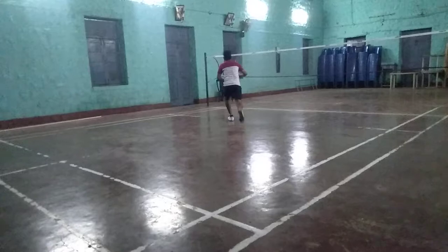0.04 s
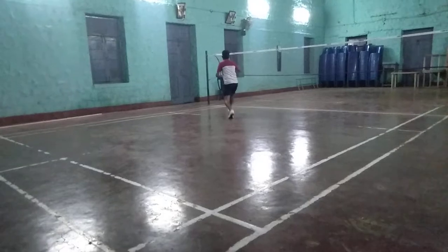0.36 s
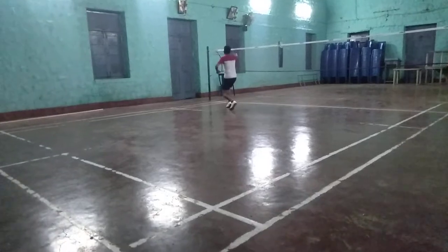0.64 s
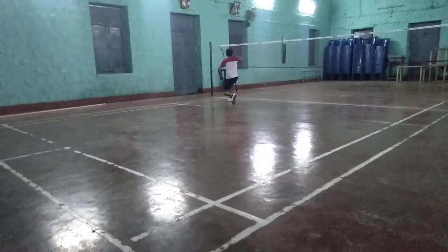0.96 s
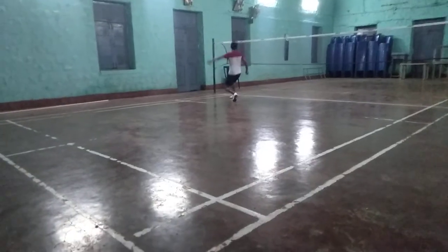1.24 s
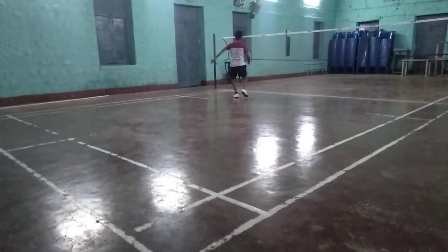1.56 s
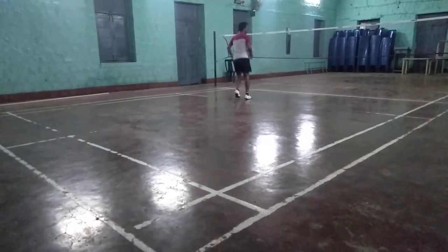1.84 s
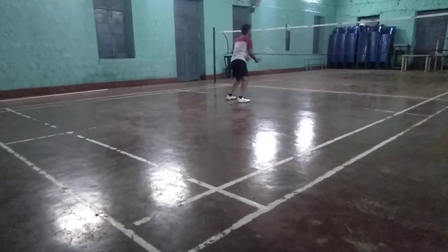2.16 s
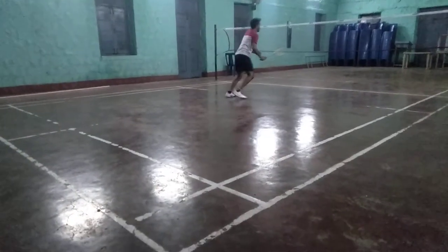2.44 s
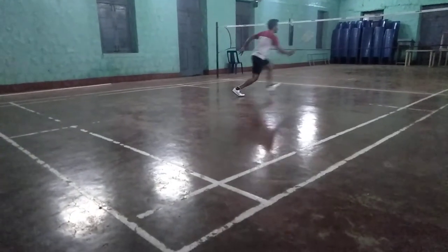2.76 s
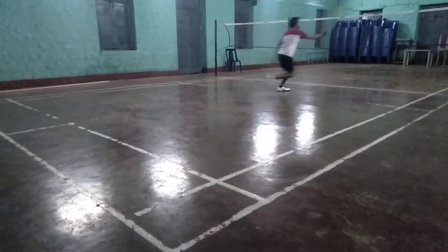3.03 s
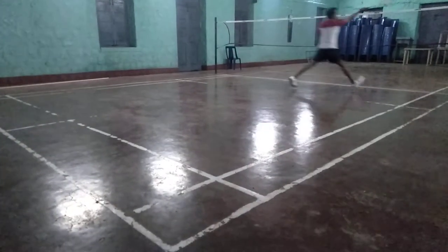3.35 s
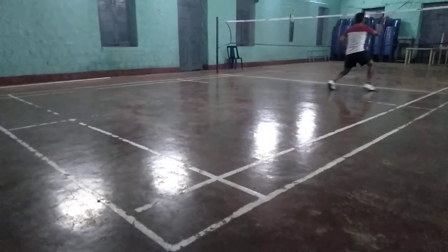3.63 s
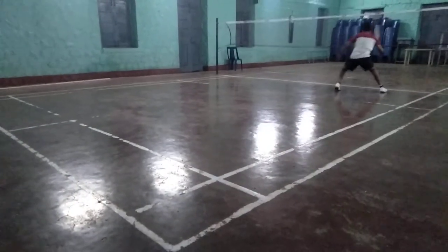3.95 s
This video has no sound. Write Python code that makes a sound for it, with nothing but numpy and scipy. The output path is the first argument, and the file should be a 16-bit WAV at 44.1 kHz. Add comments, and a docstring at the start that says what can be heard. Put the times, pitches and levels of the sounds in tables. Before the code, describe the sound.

Rubber-soled shoes squeak, thud and scuff on a glossy court as a badminton player practises footwork. The steps come in three short flurries, each ringing out in a large hall, heard by one microphone over a low rumble.

```python
"""A large, hard-walled sports hall; one microphone hears a badminton player practise footwork.
Rubber soles stick and slip on the glossy floor in short squeaks, land with thuds, slaps and clicks,
and scuff between steps; a few faint, lower squeals sound among them.
The direct sound arrives first, then the walls draw it out into a long tail over a low rumble."""
import sys
import numpy as np
from scipy import signal
from scipy.fft import rfft, irfft
from scipy.io import wavfile

SR = 44100
rng = np.random.default_rng(int(sys.argv[2]) if len(sys.argv) > 2 else 0)


def transcribe(signal):
    """Save signal, clipped to [-1, 1], as a 16-bit WAV file at the path in sys.argv[1]."""
    frames = np.atleast_2d(signal).T
    limited = np.clip(frames, -1, 1)
    pcm = np.round(limited * 32767).astype(np.int16)
    wavfile.write(sys.argv[1], SR, pcm)


N = 176400  # 4 s

# Squeaks on the court: t/s, extra level towards the microphone/dB, length/s, first f/Hz, last f/Hz,
# level/dB, wobble/share of f; then, against the fundamental: 2nd harmonic/dB, 3rd harmonic/dB, rasp/dB
SQUEAKS = [ (0.844, -3.5, 0.02, 3483, 3270, -35.5, 0.031, 4.5, -16, -4.5),
           (0.857, -3.5, 0.033, 3240, 3415, -27.5, 0.029, 0.5, -10.5, -28.5),
           (1.753, 0.5, .05, 4005, 3827, -54, 0.011, -6.5, -28, -20),
           (2.175, 5.5, 0.032, 3510, 3530, -42.5, 0.021, -4, -13, -9.5),
           (2.194, -6, 0.022, 4987, 4860, -26, 0.02, -10.5, -33, -17.5),
           (2.204, 1.5, 0.031, 4530, 4680, -29.5, 0.02, -6.5, -9.5, -11.5),
           (2.209, 8, 0.041, 4083, 4157, -31.5, 0.013, -19, -28, -22),
           (2.260, -3, 0.02, 4140, 4000, -29, .022, -4, -18, -7),
           (3.711, 2, .074, 4550, 4487, -39, 0.016, -7, -33, -15.5),
           (3.811, 0.5, 0.027, 3637, 3778, -37.5, 0.017, 11.5, 2, -5),
           (3.838, -5, 0.061, 3614, 4056, -31, 0.058, -6, -16, -24)]

def squeak(length, first_hz, last_hz, db, wobble, second_db, third_db, rasp_db):
    """Rubber sticks and slips thousands of times a second; the rate glides and wobbles with the grip."""
    t, envelope = swell(length, rise_s=0.0039, fall_s=0.017)
    grip = drift(len(t), hz=260)
    hz = np.linspace(first_hz, last_hz, len(t)) * (1 + wobble * unit(grip - grip.mean()))
    phase = 2 * np.pi * np.cumsum(hz) / SR
    harmonics_db = [0, second_db, third_db, third_db - 5]
    tone = np.sqrt(2) * sum(amp(level) * np.sin(k * phase) for k, level in enumerate(harmonics_db, 1))
    tread_chatter = unit(1 + 0.31 * drift(len(t), hz=450))
    rasp = amp(rasp_db) * rng.standard_normal(len(t))
    shimmer = unit(amp(2 * drift(len(t), hz=260)))
    return amp(db) * envelope * shimmer * (tone * tread_chatter + rasp)


# Footfalls on the court: t/s, decay/s, thud level/dB, slap level/dB, click level/dB
FOOTFALLS = [(0.537, 0.0017, -49, -37, -34.5), (.551, 0.0025, -40, -31.5, -33),
             (.890, 0.012, -54.5, -43.5, -64), (.902, 0.011, -47.5, -36, -73.5),
             (1.745, 0.0018, -49, -68, -72), (2.05, 0.0046, -51.5, -67, -65),
             (2.152, 0.015, -52, -69, -64.5), (2.247, 0.0046, -37.5, -45, -61.5),
             (3.502, 0.011, -49.5, -48, -80), (3.540, 0.0052, -33.5, -40, -40),
             (3.566, 0.028, -46, -45.5, -47.5), (3.586, 0.047, -41, -43.5, -46)]
# Spectra of the heel's thud, the sole's slap and its click: f/Hz, relative level/dB
THUD_SPECTRUM = [(30, -15), (55, -2), (100, -11), (180, 5), (280, -5), (410, -2.5), (750, -6), (1100, -7),
                 (2000, -24.5), (6000, -26.5)]
SLAP_SPECTRUM = [(200, -17), (600, -2.5), (1000, -9), (1400, -0.5), (2000, 1), (2550, 0), (3100, -13.5),
                 (5000, -8.5), (15000, -61.5)]
CLICK_SPECTRUM = [(500, -23.5), (2000, -22), (3500, 0.5), (5000, -9.5), (6500, -2.5), (9000, -20.5),
                  (15000, -25.5)]

def footfalls(ring_hz=2660, ring_decay_s=0.0018, knock_db=2):
    """Each landing is a heel thud, a sole slap and a hard click that rings the stiff sole at one pitch."""
    thud, slap, click = np.zeros((3, N))
    for start, decay_s, thud_db, slap_db, click_db in FOOTFALLS:
        for track, db in ((thud, thud_db), (slap, slap_db), (click, click_db)):
            add(track, start, amp(db) * floor_contact(decay_s))
    t = np.arange(SR // 20) / SR
    ring = np.exp(-t / ring_decay_s) * np.sin(2 * np.pi * ring_hz * t)
    knock = amp(knock_db) * signal.oaconvolve(click, ring / np.linalg.norm(ring))[:N]
    return colour(thud, THUD_SPECTRUM) + colour(slap, SLAP_SPECTRUM) + colour(click, CLICK_SPECTRUM) + knock


def floor_contact(decay_s):
    """A brief, rough push on the floor with its energy spread evenly over all frequencies."""
    t = np.arange(SR // 4) / SR
    envelope = np.exp(-t / decay_s)
    phases = np.angle(rfft(envelope * rng.standard_normal(len(t))))
    burst = irfft(np.exp(1j * phases), len(t)) * np.sqrt(envelope)
    return burst * np.linalg.norm(envelope) / np.linalg.norm(burst)


# Soles brushing the floor: t/s, length/s, level/dB
SCUFFS = [(0.605, 0.071, -52), (0.717, 0.077, -49.5), (1.139, 0.042, -57.5), (1.332, 0.044, -56),
          (1.49, 0.06, -61), (1.749, 0.057, -54), (2.155, 0.056, -44.5), (2.547, 0.049, -55),
          (2.925, 0.05, -60), (3.535, 0.27, -52)]
# Their hiss at the microphone: f/Hz, relative level/dB
SCUFF_SPECTRUM = [(300, -18), (1500, -19), (2600, 0), (5000, -6.5), (7200, 1), (10000, -8), (15000, -5)]

def scuffs(grain_db=0.5):
    """A sole slides without catching and gives a grainy hiss."""
    track = np.zeros(N)
    for start, length, db in SCUFFS:
        t, envelope = swell(length, rise_s=0.0086, fall_s=0.023)
        hiss = rng.standard_normal(len(t))
        grain = amp(grain_db * drift(len(t), hz=400))
        add(track, start, amp(db) * envelope * unit(hiss * grain))
    return colour(track, SCUFF_SPECTRUM)


# Squeals, faint at the microphone: t/s, length/s, f/Hz, rms wander/Hz, level/dB, relative octave/dB
SQUEALS = [(2.208, .14, 1634, 55, -55, -26.5), (2.527, .17, 1639, 102.8, -55, -31),
           (2.658, 0.48, 826, 25.3, -67.5, -24), (3.43, .11, 1465, 69, -50, -18)]

def squeal(length, hz, wander_hz, db, octave_db):
    """A soft, unsteady tone with a weak octave, lower than the squeaks."""
    t, envelope = swell(length, rise_s=0.073, fall_s=0.016)
    pitch = hz + wander_hz * drift(len(t), hz=2 * wander_hz)
    phase = 2 * np.pi * np.cumsum(pitch) / SR
    return amp(db) * envelope * unit(np.sin(phase) + amp(octave_db) * np.sin(2 * phase))


# Reverberation of the hall: f/Hz, time to fall by 60 dB/s
HALL_DECAY = [(100, 1.7), (300, 2.03), (800, 2.45), (1700, 1.63), (3300, 1.347), (4600, 1.27),
              (7000, 1.055), (10000, 0.8), (15000, 0.37)]

def wall_echoes(count=12, early_s=0.06, early_db=-3, build_s=0.026, tail_db=-1.5):
    """A few early reflections reach the microphone, then a dense tail whose treble dies first."""
    size = 2 * SR
    hz, t, spectra = signal.stft(rng.standard_normal(size), SR, nperseg=512)
    decay = amp(-60 * t / read(HALL_DECAY, hz)[:, None])
    tail = signal.istft(spectra * decay, SR, nperseg=512)[1][:size]
    tail *= 1 - np.exp(-np.arange(size) / SR / build_s)
    response = amp(tail_db) * tail / np.linalg.norm(tail)
    arrivals = (early_s * SR * (np.arange(count) + 1 + rng.random(count)) / count).astype(int)
    response[arrivals] += amp(early_db) * rng.choice([-1, 1], count) / np.sqrt(count)
    return response


def hall(sound, path_change_hz=9):
    """The echo paths change as the player moves: the sound swings between two sets at constant power."""
    turn = 2 * np.pi * path_change_hz * np.arange(N) / SR
    shares = np.cos(turn), np.sin(turn)
    return sum(signal.fftconvolve(sound * share, wall_echoes())[:N] for share in shares)


# Room tone around the microphone: f/Hz, relative level per hertz/dB
ROOM_SPECTRUM = [(20, 11), (45, 0.5), (80, -0.5), (120, 0), (170, 3.5), (300, -13.5), (500, -7.5),
                 (780, -10.5), (1300, -10.5), (2500, -19), (5000, -29), (7000, -23), (10000, -29.5),
                 (15000, -24)]

def room_tone(db=-57):
    """The steady rumble and hiss of the hall."""
    return amp(db) * colour(rng.standard_normal(N), ROOM_SPECTRUM)


def amp(db):
    """Decibels to gain."""
    return 10 ** (np.asarray(db) / 20)


def unit(x):
    """Scales to rms 1."""
    return x / np.sqrt(np.mean(x ** 2) + 1e-20)


def read(points, hz):
    """Reads a table on a log-frequency axis."""
    f, value = np.transpose(points)
    return np.interp(np.log(hz + 1), np.log(f + 1), value)


def add(mix, start_s, sound):
    """Mixes a sound in at a time."""
    part = mix[round(start_s * SR):][:len(sound)]
    part += sound[:len(part)]


def drift(count, hz):
    """Smooth random motion of rms about 1, up to a rate."""
    f = np.fft.rfftfreq(N, 1 / SR)
    spectrum = rfft(rng.standard_normal(N)) * np.exp(-(f / hz) ** 2)
    return unit(irfft(spectrum, N))[:count]


def swell(length, rise_s, fall_s):
    """Time axis and an envelope with rounded attack and release."""
    t = np.arange(0, length, 1 / SR)
    attack = np.sin(np.pi / 2 * np.clip(t / rise_s, 0, 1))
    release = np.sin(np.pi / 2 * np.clip((length - t) / fall_s, 0, 1))
    return t, attack * release


def colour(x, spectrum, size=4096):
    """Applies a causal filter of energy 1 with the given spectral shape."""
    hz = abs(np.fft.fftfreq(size, 1 / SR))
    log_gain = np.log(amp(read(spectrum, hz)))
    minimum_phase = np.exp(np.conj(signal.hilbert(log_gain)))
    taps = np.fft.ifft(minimum_phase).real
    return signal.oaconvolve(x, taps / np.linalg.norm(taps))[:N]


def scene():
    """Shoes, their echo and the room tone in mono; some squeaks are aimed more at the microphone."""
    direct = footfalls() + scuffs()
    for start, *settings in SQUEALS:
        add(direct, start, squeal(*settings))
    into_hall = direct.copy()
    for start, aim_db, *settings in SQUEAKS:
        sound = squeak(*settings)
        add(direct, start, amp(aim_db) * sound)
        add(into_hall, start, sound)
    return (direct + hall(into_hall) + room_tone())[None]


def record(dry):
    """The microphone fades in, and its highest treble is cut off."""
    open_s, rise_s, cutoff_hz = 0.11, 0.21, 15800
    fade_in = np.sqrt(np.clip((np.arange(N) / SR - open_s) / rise_s, 0, 1))
    lowpass = signal.firwin(511, cutoff_hz, window=("kaiser", 9), fs=SR)
    return signal.oaconvolve(dry * fade_in, lowpass[None], "same")


dry = scene()
out = record(dry)
transcribe(out)
```